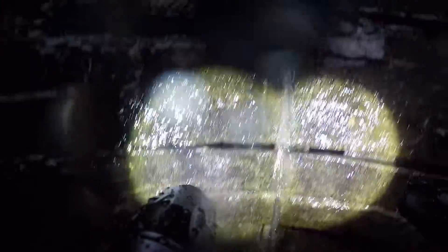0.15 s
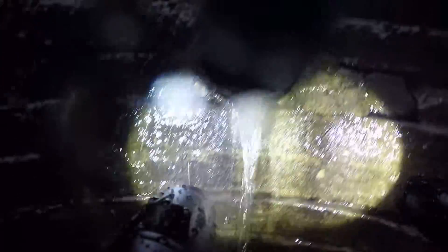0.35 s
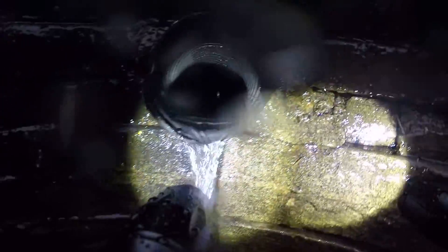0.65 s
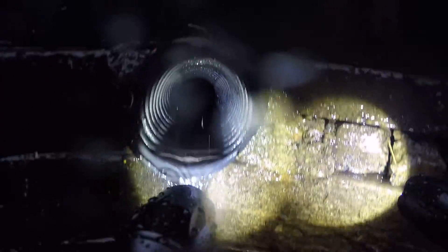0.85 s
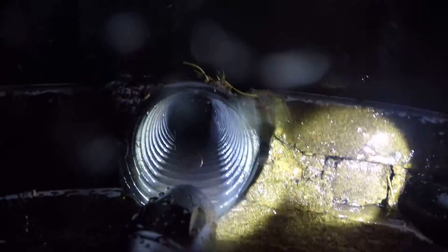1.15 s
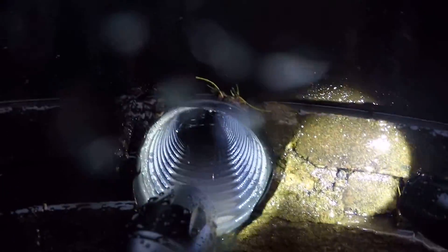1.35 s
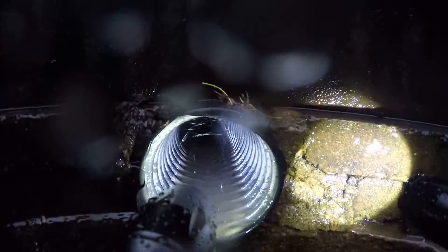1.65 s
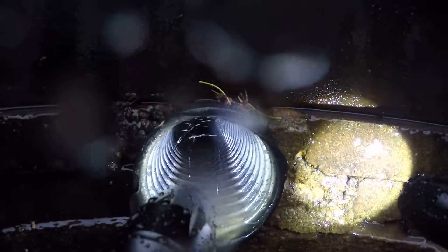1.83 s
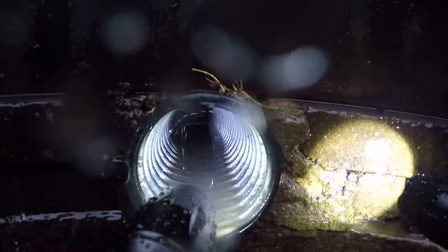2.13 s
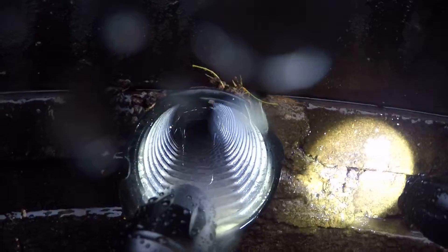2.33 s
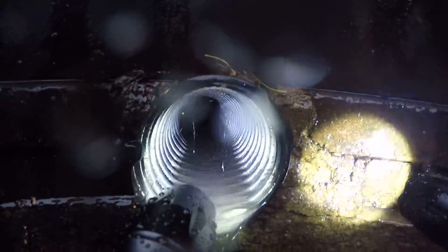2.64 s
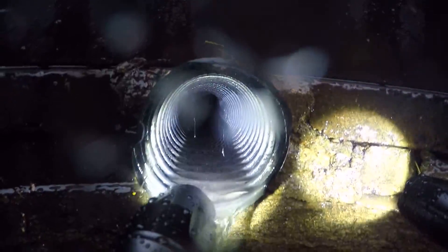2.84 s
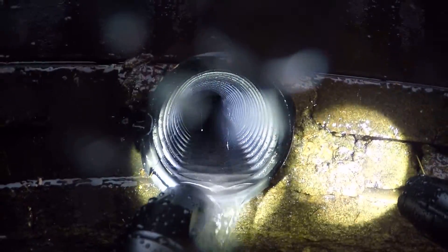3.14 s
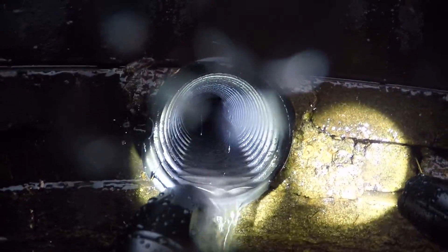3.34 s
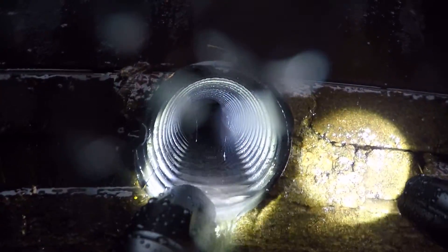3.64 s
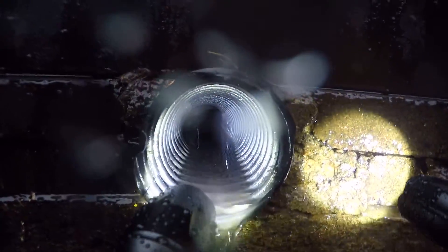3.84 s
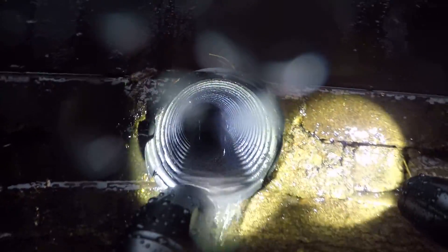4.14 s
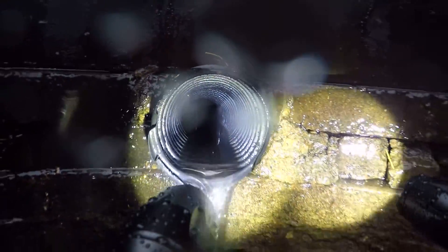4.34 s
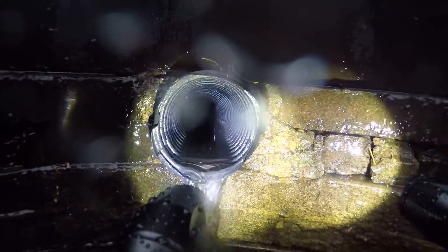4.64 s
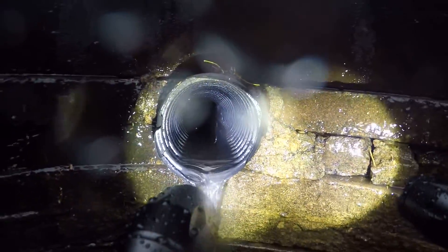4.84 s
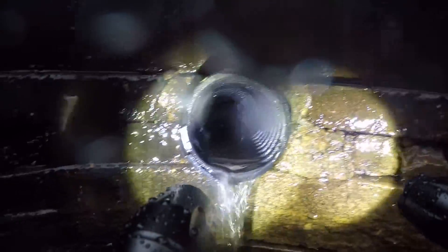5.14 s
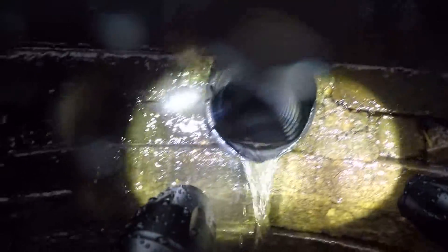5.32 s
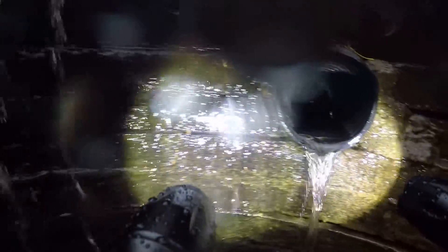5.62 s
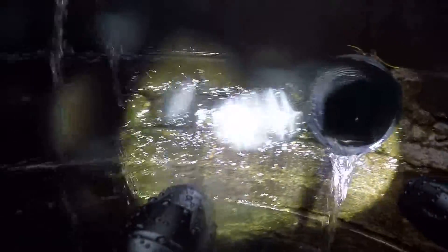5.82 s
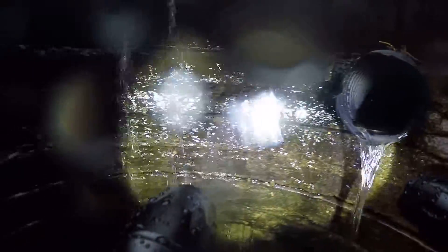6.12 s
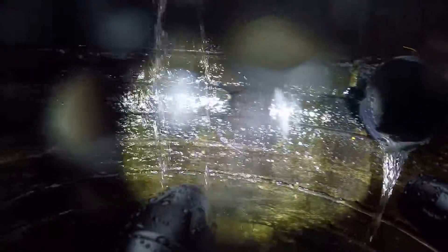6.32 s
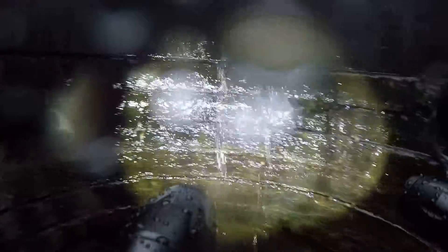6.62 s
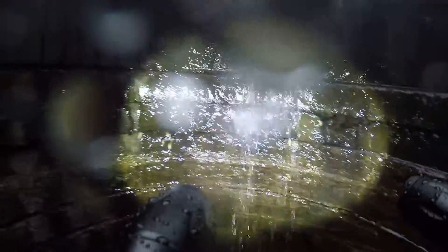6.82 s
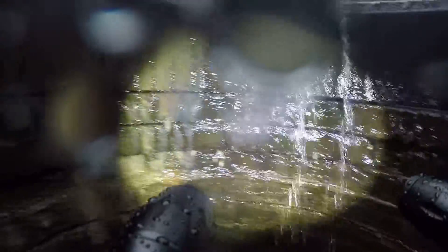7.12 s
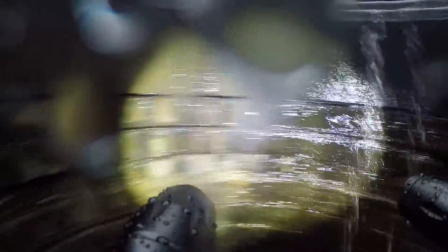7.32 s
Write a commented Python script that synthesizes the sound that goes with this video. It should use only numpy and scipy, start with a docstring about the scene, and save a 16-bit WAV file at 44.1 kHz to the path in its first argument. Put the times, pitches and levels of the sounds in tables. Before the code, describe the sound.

Water trickles and splatters steadily down a wet brick shaft, with bubbly plops, sharp drop ticks on plastic close by and low handling thumps.

```python
"""From start to end water trickles down a brick shaft: hiss and ringing air bubbles, echoed by the walls and
coloured by a plastic housing. From the first moments louder splashes (noise bursts) and bubbles (fading tones)
join in, with dull knocks, a soft low pool gurgle, and a boom from the hand-held pole (noise at two low pitches).
Drops tick on the housing (a push rings its tones), hardest near 0.6 and 5.3 s; splashes crowd near 3.3 s.
The boom jolts most near 0.3 s, is calmer from about 2 to 4.8 s, then jolts harder again."""
import sys
import numpy as np
from scipy import signal
from scipy.fft import rfft, irfft
from scipy.io import wavfile
from scipy.ndimage import uniform_filter1d

SR = 44100
rng = np.random.default_rng(int(sys.argv[2]) if len(sys.argv) > 2 else 0)


def wav_record(signal):
    """Record a signal, one row per channel, as 16-bit PCM in the file named by sys.argv[1]."""
    frames = np.transpose(np.atleast_2d(signal))
    bounded = np.clip(frames, -1, 1)
    # unit amplitude maps onto the largest positive 16-bit level
    quanta = np.round(bounded * 32767).astype(np.int16)
    wavfile.write(sys.argv[1], SR, quanta)


N = 329427   # length in samples

# The trickle over time. Each row: time in seconds, level below 6 kHz in dB, level of the treble spray
# above 6 kHz in dB, level of the pool gurgle in dB.
FLOW_CURVE = [(0.0, -40, -47.5, -53.5), (1.1, -42, -48.5, -51), (2.3, -41, -48, -53),
              (3.2, -40.5, -48.5, -54.5), (4.4, -40, -48, -53.5), (5.2, -41.5, -50, -54.5),
              (5.9, -39.5, -47, -54), (6.8, -41, -47, -54.5), (7.47, -40, -46.5, -53.5)]
# Louder slugs of water landing. Each row: start in seconds, approximate peak in dB, centre pitch in Hz,
# time to fade by 60 dB in seconds, level of the treble spray relative to the body in dB.
SPLASH_EVENTS = [(0.102, -18, 2200, 0.13, -14), (0.378, -28, 1660, 0.088, -22),
                 (0.449, -26.5, 2620, 0.24, -7), (0.651, -25, 2490, 0.22, -11),
                 (0.886, -26, 2730, 0.2, -15), (1.083, -21.5, 2450, 0.092, -12),
                 (1.157, -24, 4500, 0.16, -15), (1.297, -25, 2430, 0.048, -18),
                 (1.482, -23, 1900, 0.12, -9), (1.664, -27, 1820, 0.054, -18),
                 (1.713, -28, 1780, 0.051, -18), (1.803, -19, 2200, 0.094, -25),
                 (1.905, -23.5, 5200, 0.075, 19), (1.963, -27, 1900, 0.064, -14),
                 (1.978, -24.5, 1830, 0.12, -11), (2.212, -25, 2250, 0.12, -8),
                 (2.242, -27, 4530, 0.12, -2), (2.363, -34, 3200, 0.046, -2), (2.573, -22, 6900, 0.03, -7),
                 (2.939, -20.5, 3440, 0.039, -23), (2.98, -19.5, 1820, 0.043, -21),
                 (3.093, -19, 2100, 0.08, -8.5), (3.233, -24.5, 2740, 0.085, -8),
                 (3.257, -30, 2600, 0.041, -5), (3.286, -14.5, 2700, 0.093, -13),
                 (3.291, -15, 3230, 0.072, -20), (3.293, -17.5, 3840, 0.064, -12),
                 (3.296, -23, 1810, 0.07, -20), (3.305, -18, 2660, 0.072, -23),
                 (3.33, -28.5, 2600, 0.16, -5), (3.433, -22.5, 2350, .08, -6),
                 (3.477, -25, 1900, 0.13, -16), (3.816, -26, 1770, 0.076, -18),
                 (3.904, -24, 3180, 0.055, -20), (3.971, -26, 2400, 0.21, -15),
                 (4.154, -25.5, 2640, 0.19, -4), (4.366, -29, 2490, 0.23, -21),
                 (4.506, -18.5, 2500, 0.11, -22), (4.669, -23.5, 3800, 0.055, -10),
                 (4.748, -21.5, 2560, 0.057, -24), (4.889, -22, 2530, 0.041, -22),
                 (4.957, -23.5, 3520, 0.09, -19), (5.076, -23, 2600, 0.15, -16),
                 (5.192, -22.5, 2470, 0.049, -23), (5.407, -22.5, 1750, 0.094, -12),
                 (5.662, -24, 3500, 0.073, -9), (5.691, -23.5, 2440, 0.051, -21),
                 (5.754, -20.5, 2470, 0.12, -23), (5.868, -25, 1850, 0.16, -19),
                 (5.956, -25, 3640, 0.061, -16), (6.176, -27, 2490, 0.055, -18),
                 (6.344, -22, 1720, 0.054, -22), (6.468, -20.5, 2700, 0.1, -25),
                 (6.662, -26.5, 2770, 0.13, -16), (6.89, -20, 2290, 0.1, -16),
                 (6.964, -24, 1850, 0.047, -18), (7.031, -23.5, 5070, 0.045, -22),
                 (7.087, -20, 3150, 0.091, -23), (7.097, -18.5, 2660, 0.07, -22),
                 (7.271, -20.5, 2490, 0.12, -21), (7.319, -19.5, 3330, 0.094, -25)]
# Drops on the housing; each spot favours other tones. Each row: start in seconds, peak of the ringing in dB,
# then extra dB for the tones near 600 Hz, 2.3 kHz, 3 kHz, 4 kHz and 10 kHz (near 1.6 kHz it is 0).
HOUSING_TICKS = [(0.234, -23, -13, -2, 5, -8, 11), (0.267, -22.5, -8, -2, 9, 15, 7),
                 (0.606, 4, -3.5, -3, 3.5, 8.5, 4.5), (0.709, -15.5, -23, 9, -9, -19, -4),
                 (1.024, -15.5, 13, 10, -10, -17, 4), (1.072, -17, -11, 13, 11, 10, 9),
                 (1.597, -17, -9, -2, -1, 6, -5), (1.8744, -5, 4, 8.5, -3, -5, -13),
                 (2.536, -27.5, -4, -4, -8, -14.5, -10), (2.729, -22.5, -18, -8, -23, -18, -10),
                 (4.264, -32, 18, -9, -18, -12, -8), (4.291, -37, 5, -5, -8, -12, -8),
                 (4.702, -22, -8, 11, 12, -3, 12), (4.776, -26, -6, -2, -12, -22, -5),
                 (4.79, -14.5, -10, 8, 15, 8, -5), (4.802, -16, -3, 16, -1, 1, 2),
                 (4.84, -22.5, 3, 10, 10, -2, -4), (5.276, 3.5, -6, 6, 11.5, 10.5, -16),
                 (6.215, -14.5, 3, 1, 2, -1, 4), (6.601, -17.5, 0, 0, -1, 12, 6),
                 (7.166, -10.5, -6, 8, -5, -4, -7), (7.465, -10.5, -16, 7, -12, -1, -7)]
# Tones of the struck housing. Each row: pitch in Hz, level in dB, time to fade by 60 dB in seconds.
HOUSING_MODES = [(403, -30, 0.0049), (840, 3, 0.0056), (1270, -5.5, 0.021), (1610, 10.5, 0.01),
                 (2200, -0.5, 0.012), (2524, -3, 0.028), (2804, 1, 0.016), (3170, 5.5, 0.012),
                 (3830, -3, 0.014), (4240, 3.5, 0.0052), (5360, -5.5, 0.0087), (6400, -19, 0.012),
                 (7700, -0.5, 0.0026), (10240, -5, 0.0029), (12800, -6, 0.0035), (15200, -16, .003)]
# How the housing colours sound passing through. Each row: centre in Hz, width in Hz, lift in dB.
HOUSING_LIFTS = [(474, 215, -12.5), (875, 42, 3.5), (1130, 84, 5.5), (1410, 240, -1.5), (1820, 500, 7),
                 (2490, 540, 8.5), (3202, 82, 6), (3770, 710, 5.5), (4390, 124, 5.5), (5080, 670, 8.5),
                 (6620, 440, 3), (9960, 1050, 4)]
# Tone balance of the water. Each row: frequency in Hz, relative level in dB.
WATER_SPECTRUM = [(240, -42), (400, -22), (632, -6), (983, -5.5), (1110, -4), (1350, -6.5), (1760, 0),
                  (2530, -1), (2860, 0.5), (5180, -9), (15300, -24)]
# Tone balance of the pool gurgle. Each row: frequency in Hz, relative level in dB.
GURGLE_SPECTRUM = [(41, -39), (70, 9), (86, -17), (135, -5), (204, -0.5), (231, 3), (290, 6.5), (329, -3),
                   (420, -9), (600, -12.5), (780, -33), (1320, -120)]
# Low bending tones of the pole. Each row: pitch in Hz, width of each of two filter passes in Hz,
# relative level in dB.
POLE_MODES = [(35.6, 11.9, 4.5), (50.6, 6.2, -5.5)]
# Single bubbles in the pool. Each row: start in seconds, peak in dB, starting pitch in Hz,
# time to fade by 60 dB in seconds.
BUBBLE_EVENTS = [(0.05, -28.5, 960, 0.015), (0.145, -42, 860, .09), (0.19, -49, 880, .09),
                 (0.345, -49, 640, 0.12), (1.014, -35.5, 705, 0.019), (1.137, -30.5, 1080, 0.0087),
                 (1.480, -21, 3360, 0.014), (1.663, -32, 1750, 0.031), (1.687, -41, 1110, 0.041),
                 (1.912, -39, 910, 0.044), (2.008, -35, 1170, 0.03), (2.034, -38, 877, 0.077),
                 (2.118, -39, 1120, 0.027), (2.232, -40.5, 900, 0.064), (2.243, -30, 4100, .025),
                 (2.297, -37, 1130, 0.087), (2.584, -37, 7460, 0.043), (2.779, -37, 1130, 0.15),
                 (3.08, -40, 1240, .08), (3.15, -41, 714, 0.044), (3.156, -39, 1130, 0.099),
                 (3.2, -43, 1780, .07), (3.274, -34.5, 858, 0.1), (3.288, -25, 4000, .03),
                 (3.307, -25, 2630, 0.035), (3.32, -38, 800, 0.044), (3.33, -31, 5000, 0.022),
                 (3.332, -40, 670, 0.1), (3.457, -35, 3180, .025), (4.265, -40, 1130, 0.024),
                 (4.511, -35, 2120, .03), (4.669, -36, 3700, .02), (4.714, -35, 905, 0.024),
                 (4.955, -35, 3270, 0.034), (5.559, -44, 845, 0.21), (5.74, -46, 765, .08),
                 (6.01, -43, 655, 0.085), (6.532, -44, 614, 0.076), (6.625, -31, 2800, .03),
                 (6.16, -49, 800, 0.047), (6.67, -38, 1150, 0.037), (7.113, -38, 670, 0.052),
                 (7.138, -36, 990, .03), (7.27, -32, 2370, 0.018), (7.333, -37, 980, 0.019)]
# Dull knocks from the pool and pole. Each row: start in seconds, peak in dB, starting pitch in Hz.
KNOCK_EVENTS = [(0.098, -38, 123), (0.61, -43, 176), (0.669, -38, 230), (0.78, -44, 170), (1.018, -45, 318),
                (1.215, -41, 374), (2.361, -40, 238), (2.88, -46.5, 420), (3.04, -45, 380),
                (3.125, -43, 420), (3.493, -42, 290), (3.819, -41, 270), (4.67, -37, 242),
                (4.752, -39.5, 258), (5.06, -42, 295), (5.192, -41, 237), (5.408, -36.5, 193),
                (5.417, -35, 135), (6.527, -38, 124), (6.823, -36.5, 237), (7.064, -41, 242),
                (7.191, -37, 252), (7.327, -36, 290)]
# Jolts of the hand on the pole. Each row: start of the hold in seconds, level in dB, hold in seconds.
HAND_JOLTS = [(0.043, -30, 0.15), (0.316, -16.5, 0.062), (0.613, -25.5, 0.13), (0.829, -22.5, 0.014),
              (0.97, -30.5, 0.025), (1.152, -31.5, 0.062), (1.37, -35, 0.041), (1.503, -41, 0.16),
              (1.755, -37.5, 0.032), (1.89, -37.5, 0.054), (2.1, -47, 0.036), (2.39, -39, .02),
              (2.554, -41, 0.13), (2.847, -40, 0.031), (3.035, -38, 0.038), (3.244, -40, 0.048),
              (3.434, -43.5, 0.047), (3.703, -43, 0.037), (3.843, -41, 0.046), (4.205, -40, .19),
              (4.887, -35, 0.077), (5.089, -27, 0.066), (5.284, -32, 0.021), (5.429, -25, 0.015),
              (5.5, -30, 0.017), (5.632, -35.5, 0.065), (5.886, -37, 0.022), (6.273, -27, 0.035),
              (6.41, -30, 0.23), (6.836, -25, 0.052), (6.972, -25.5, 0.014), (7.146, -30, 0.11),
              (7.362, -25.5, 0.015)]
# Trembling of the hand between jolts. Each row: time in seconds, level in dB.
HAND_TREMBLE = [(0.0, -37), (1.4, -45), (2.0, -39), (3.0, -49), (3.6, -45.5), (4.35, -42), (4.8, -47.5),
                (7.47, -36)]
# Brief dips of the boom. Each row: middle in seconds, depth in dB.
BOOM_DIPS = [(0.52, 11), (1.29, 4), (2.04, 23), (5.255, 9), (5.84, 13), (6.0, 9), (6.385, 10), (6.955, 12),
             (7.06, 12)]

SHAFT_T60_S, SHAFT_DB = 0.14, -1.5   # fade of the wall echo by 60 dB, and its level
NEAR_SHAFT_DB = -6   # single bubbles burst close by, so the walls answer them less
CRACK_DB, CRACK_HZ = -16, 12000   # the snap of each drop above the housing tones
JOLT_RISE_DB_PER_S, JOLT_FALL_DB_PER_S = 356, 175
TREMBLE_PER_S, TREMBLE_SWING_DB = 5.5, 2.5
DIP_S = 0.016   # from the middle of a dip to where its depth is about a third
KNOCK_T60_S = 0.059
# scattered middle-sized bubbles in the pool
BLUB_COUNT, BLUB_DB, BLUB_SPREAD_DB = 350, -52.5, 3
BLUB_LOW_HZ, BLUB_OCTAVES, BLUB_CYCLES = 560, 2.0, 70
# small droplets chirping on the wet wall
PLIP_COUNT, PLIP_DB, PLIP_SPREAD_DB = 1200, -51, 2
PLIP_LOW_HZ, PLIP_OCTAVES, PLIP_CYCLES = 1400, 2.6, 130
CUTOFF_HZ = 15400


def trickle(level_db, spray_db):
    """Wash and bubbles heard through shaft and housing; the treble has its own level, the spray."""
    fizz = bubbles(500, 559.2, 4014, cycles=71.0, spread_db=3.0)
    mix = wash() + 0.27 * shaft(fizz, SHAFT_DB)
    water = colour(mix, WATER_SPECTRUM, HOUSING_LIFTS)
    low = signal.sosfilt(signal.butter(4, 6000, fs=SR, output="sos"), water)
    high = highpass(water, 4, 6000)
    return amp(level_db) * rms_one(low) + amp(spray_db) * rms_one(high)


def wash():
    """Third-octave bands of hiss: all follow the slugs of the stream, each also splutters on its own."""
    together = surges(45, 3.0, .06, steady=1.1, rise_s=.003)
    edges = 350 * 2 ** (np.arange(18) / 3)   # Hz
    white, out = rng.standard_normal((2, N)), 0
    for k, (low, high) in enumerate(zip(edges, edges[1:])):
        # the treble is steadier
        own = surges(40, 2.2, 0.089, steady=0.00011 * low + 0.53, rise_s=0.0012)
        band_filter = signal.butter(2, [low, high], "band", fs=SR, output="sos")
        out = out + signal.sosfilt(band_filter, white[k % 2]) * own
    return rms_one(out * together ** 0.74)


def bubbles(per_s, low_hz, high_hz, cycles, spread_db):
    """Trapped air pockets swell and ring some cycles, at pitches spread over the range."""
    clicks = grains(per_s, spread_db)
    pitch_number = rng.integers(0, 30, N)   # each click is dealt one of 30 pitches
    pitches = np.geomspace(low_hz, high_hz, 30) * rng.uniform(.96, 1.04, 30)
    total = 0
    for k, hz in enumerate(pitches):
        ringing = ring(clicks * (pitch_number == k), hz, cycles / hz)
        total = total + resonance(ringing, hz, 0.23 * hz) * np.sqrt(hz)
    return rms_one(total)


def splashes():
    """Each slug is a burst of housing-coloured noise about its own pitch, with its own share of spray."""
    out, t = np.zeros(N + SR), np.arange(SR // 4) / SR
    count, length = len(SPLASH_EVENTS), 2 * len(t)
    # separate droplets crackle: the level jumps every 105 samples
    crackle_db = 2.0 * np.repeat(rng.standard_normal((count, length // 105)), 105, axis=1)
    noise = rng.standard_normal((count, length)) * amp(crackle_db)
    for (s, db, hz, t60, treble_db), white in zip(SPLASH_EVENTS, noise):
        wet = colour(white, WATER_SPECTRUM, HOUSING_LIFTS)[:length]
        upper = resonance(resonance(wet, 3400, 2000), 3200, 2300)
        body = resonance(wet, hz, 480) + 0.25 * upper
        spray = rms_one(highpass(wet, 3, 6000))
        # the first half only lets the filters settle
        burst = rms_one((rms_one(body) + amp(treble_db) * spray)[len(t):])
        burst = burst * amp(-60 * t / t60) * (1 - np.exp(-t / 0.00038))
        # noise peaks stand about 2.6 times above its rms
        out[round(s * SR):][:len(t)] += amp(db) * burst / 2.6
    return out[:N]


def ticks():
    """A drop is a short push that rings every tone of the housing."""
    out, click = np.zeros(N + SR), np.eye(1, SR // 20)[0]
    modes = []
    for k, (hz, db, t60) in enumerate(HOUSING_MODES):
        modes.append((-1) ** (k // 2) * amp(db) * ring(click, hz, t60))   # signs alternate in pairs
    modes = highpass(np.array(modes), 3, 350)
    crack = amp(CRACK_DB) * highpass(click, 2, CRACK_HZ)
    mode_hz = np.array(HOUSING_MODES)[:, 0]
    spot_hz = [600, 1600, 2300, 3000, 4000, 10000]
    for s, db, low, *upper in HOUSING_TICKS:
        favour_db = np.interp(np.log(mode_hz), np.log(spot_hz), [low, 0, *upper])
        tick = amp(favour_db) @ modes
        out[round(s * SR):][:len(tick)] += amp(db) * (tick / np.abs(tick).max() + crack)
    return out[:N]


def tones(rows, rise_s, glide, waver):
    """Bubbles and knocks: short damped tones whose pitch slides as they fade, each its own way."""
    out = np.zeros(N + SR)
    bends = glide + waver * rng.standard_normal((len(rows), 1))
    for (s, db, hz, t60), bend in zip(rows, bends):
        t = np.arange(int(t60 * SR) + 2) / SR
        envelope = amp(-60 * t / t60) * (1 - np.exp(-t / rise_s))
        phase = 2 * np.pi * hz * (t + bend * t ** 2 / t60)
        out[round(s * SR):][:len(t)] += amp(db) * envelope / envelope.max() * np.sin(phase)
    return out[:N]


def boom(level_db):
    """Handling shakes the pole, which answers at its low bending tones."""
    shake = rng.standard_normal(N + SR)
    sway = 0
    for hz, width, db in POLE_MODES:
        sway = sway + amp(db) * resonance(resonance(shake, hz, width), hz, width)
    # evened out, so that the hand, not chance, sets the strength
    strength = np.sqrt(uniform_filter1d(sway ** 2, size=2600))
    even = sway / (strength + 0.058 * sway.std())
    swung = amp(level_db) * even[SR // 2:][:N]
    # the heavy pole cannot follow fast changes
    smooth = signal.sosfiltfilt(signal.butter(3, 68, fs=SR, output="sos"), swung)
    # the grip rubs
    rub = resonance(resonance(rng.standard_normal(N), 45, 99), 45, 99)
    return smooth + amp(.5 * level_db - 43.5) * rms_one(rub)


def handling():
    """Level of the shaking in dB: an uneven tremble, jolts that rise, hold and fall, and brief dips."""
    t = np.arange(N) / SR
    steps = np.arange(0, N / SR + 1, .5 / TREMBLE_PER_S)   # two random points per tremble
    wobble = np.interp(t, steps, rng.standard_normal(len(steps)))
    power = amp(in_time(HAND_TREMBLE)[0] + TREMBLE_SWING_DB * wobble) ** 2
    for s, db, hold in HAND_JOLTS:
        rise_db = JOLT_RISE_DB_PER_S * np.maximum(s - t, 0)
        fall_db = JOLT_FALL_DB_PER_S * np.maximum(t - s - hold, 0)
        power = power + amp(db - rise_db - fall_db) ** 2
    dips_db = sum(db * np.exp(-((t - s) / DIP_S) ** 2) for s, db in BOOM_DIPS)
    return 10 * np.log10(power) - dips_db


def gurgle(level_db):
    """Low wash in the pool: noise that surges and keeps only its low tones."""
    pool = rng.standard_normal(N) * surges(35, 2.1, 0.097, steady=0.48, rise_s=0.0029)
    return amp(level_db) * rms_one(colour(pool, GURGLE_SPECTRUM))


def blubs(count, db, spread_db, low_hz, octaves, cycles):
    """Rows of bubbles born at random moments; each fades by 60 dB over the same number of cycles."""
    when, pitch, size = rng.random((count, 3)).T
    hz = low_hz * 2 ** (octaves * pitch)
    level_db = db - spread_db * np.log(1 - .95 * size)   # many soft, a few loud
    return list(zip(when * N / SR, level_db, hz, cycles / hz))


def shaft(x, wet_db):
    """Close brick walls answer with a dense short tail."""
    t = np.arange(SR // 2) / SR
    # the first echo returns after 3 ms
    tail = rng.standard_normal(len(t)) * amp(-60 * t / SHAFT_T60_S) * (t > .003)
    echo = signal.oaconvolve(x, tail / np.sqrt(np.sum(tail ** 2)))[:N]
    return x + amp(wet_db) * echo


def surges(per_s, spread_db, t60, steady, rise_s):
    """The stream breaks into slugs: each swells quickly and dies away over a steady part."""
    # power falls by 120 of these dB while the sound falls by 60 dB
    power = signal.lfilter([1], [1, -amp(-120 / (t60 * SR))], grains(per_s, spread_db) ** 2)
    power = signal.lfilter([1], [1, -np.exp(-1 / (rise_s * SR))], power)
    return np.sqrt(steady + power / power.mean())


def grains(per_s, spread_db):
    """Random clicks, many small and a few large, pushing either way."""
    size_db = spread_db * np.minimum(rng.exponential(1, N), 3.2)
    sizes = amp(size_db) * rng.choice([-1, 1], N)
    return sizes * (rng.random(N) < per_s / SR)


def colour(x, spectrum, lifts=()):
    """Filter with the given spectrum and bell-shaped lifts that never sounds ahead of its input."""
    hz = np.linspace(1, SR / 2, 4097)
    curve_hz, curve_db = np.transpose(spectrum)
    level_db = np.interp(np.log(hz), np.log(curve_hz), curve_db)
    level_db += sum(db / (1 + (2 * (hz - f) / width) ** 2) for f, width, db in lifts)
    # folding the cepstrum puts the filter's energy as early as possible (minimum phase)
    cepstrum = irfft(level_db * np.log(10) / 20)
    cepstrum[1:4096] *= 2
    cepstrum[4097:] = 0
    return signal.oaconvolve(x, irfft(np.exp(rfft(cepstrum))))[:N]


def resonance(x, hz, width):
    """A two-pole filter favours one pitch, with gain 1 on top."""
    r = np.exp(-np.pi * width / SR)
    feedback = [1, -2 * r * np.cos(2 * np.pi * hz / SR), r * r]
    return signal.lfilter(np.array([1, 0, -1]) * (1 - r * r) / 2, feedback, x)


def ring(clicks, hz, t60):
    """A unit click sets a fading sine of starting height 1 ringing."""
    r, w = amp(-60 / (t60 * SR)), 2 * np.pi * hz / SR
    # the tiny offset keeps numbers from shrinking so far that they slow the filter
    return signal.lfilter([0, np.sin(w)], [1, -2 * r * np.cos(w), r * r], clicks + 1e-18)


def highpass(x, order, hz):
    """Keeps what lies above a frequency."""
    return signal.sosfilt(signal.butter(order, hz, "high", fs=SR, output="sos"), x)


def amp(db):
    """Gain of a level in dB."""
    return 10 ** (np.asarray(db) / 20)


def rms_one(x):
    """Scaled to rms (average strength) 1."""
    return x / np.sqrt(np.mean(x ** 2) + 1e-20)


def in_time(rows):
    """Columns of a curve at every sample."""
    s, *columns = np.transpose(rows)
    return [np.interp(np.arange(N) / SR, s, c) for c in columns]


def scene():
    """All sources added together at the microphone."""
    level_db, spray_db, pool_db = in_time(FLOW_CURVE)
    stream = trickle(level_db, spray_db)
    single = shaft(tones(BUBBLE_EVENTS, rise_s=0.00019, glide=0.087, waver=0.025), NEAR_SHAFT_DB)
    knock_rows = [(s, db, hz, KNOCK_T60_S) for s, db, hz in KNOCK_EVENTS]
    knocks = tones(knock_rows, rise_s=0.002, glide=-0.0079, waver=0.053)
    middle = blubs(BLUB_COUNT, BLUB_DB, BLUB_SPREAD_DB, BLUB_LOW_HZ, BLUB_OCTAVES, BLUB_CYCLES)
    small = blubs(PLIP_COUNT, PLIP_DB, PLIP_SPREAD_DB, PLIP_LOW_HZ, PLIP_OCTAVES, PLIP_CYCLES)
    scattered = tones(middle + small, rise_s=0.0012, glide=0.039, waver=0.058)
    scattered = colour(scattered, WATER_SPECTRUM, HOUSING_LIFTS)
    pool = gurgle(pool_db) + single + knocks + scattered
    return (stream + splashes() + ticks() + boom(handling()) + pool)[None]


def record(dry):
    """The loudest peaks are rounded, the top is cut."""
    rounded = dry / (1 + np.abs(dry / .95) ** 6) ** (1 / 6)
    return signal.sosfilt(signal.ellip(12, .5, 80, CUTOFF_HZ, fs=SR, output="sos"), rounded)


dry = scene()
out = record(dry)
wav_record(out)
```